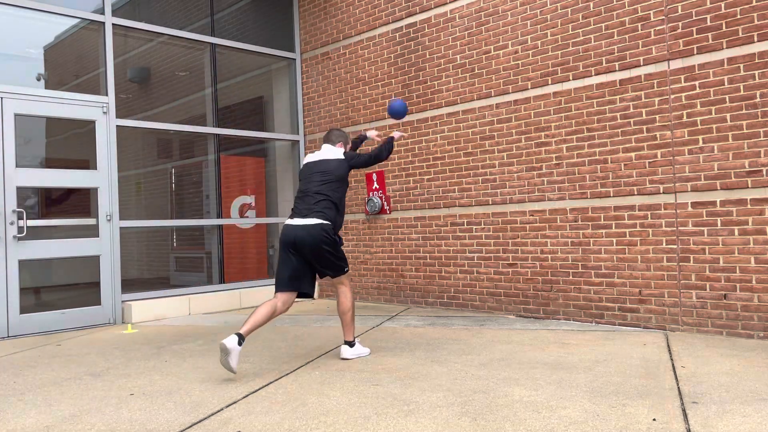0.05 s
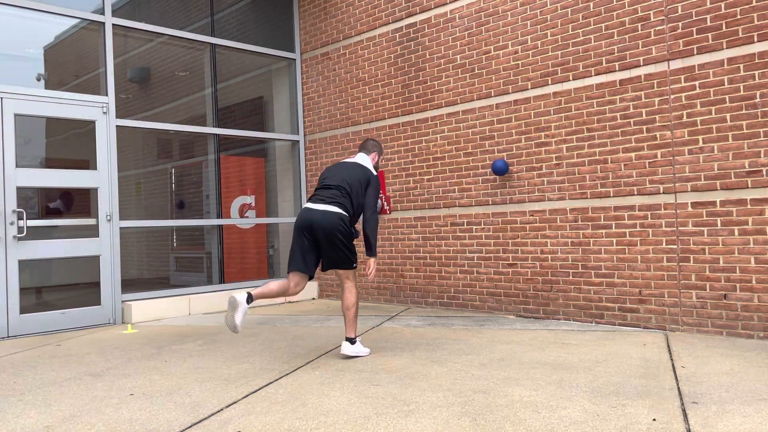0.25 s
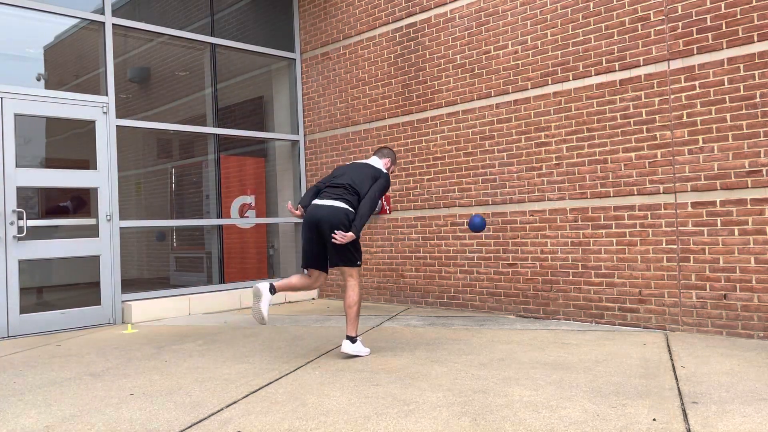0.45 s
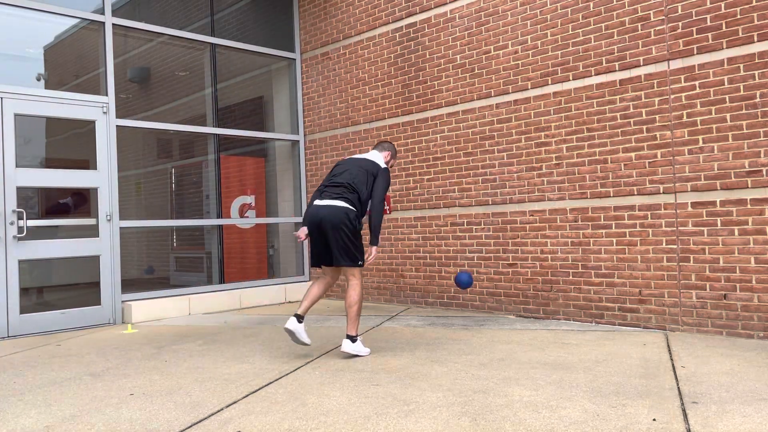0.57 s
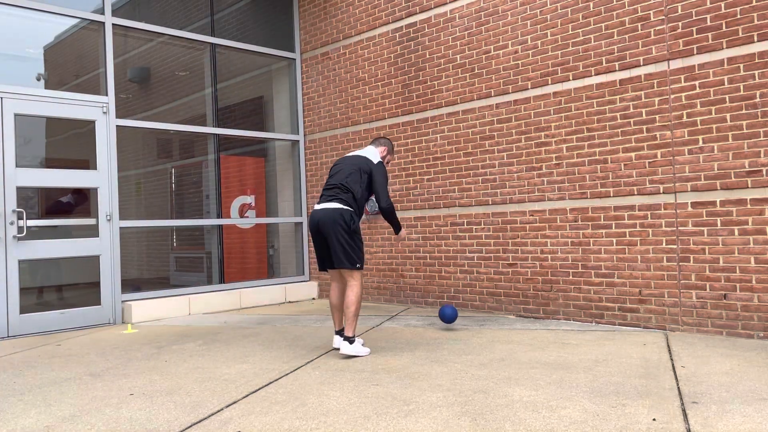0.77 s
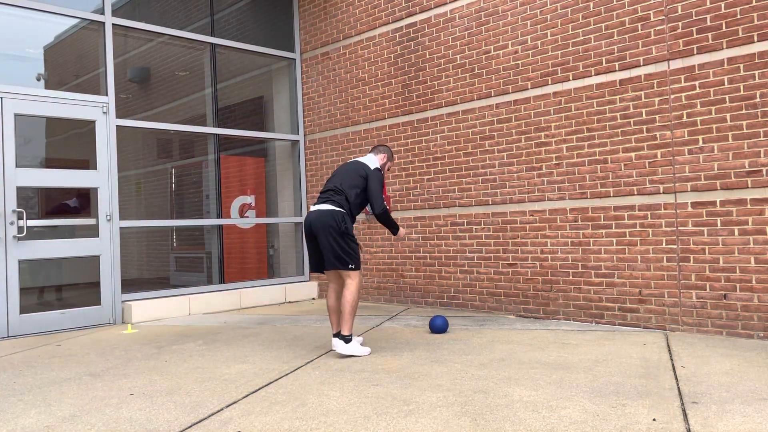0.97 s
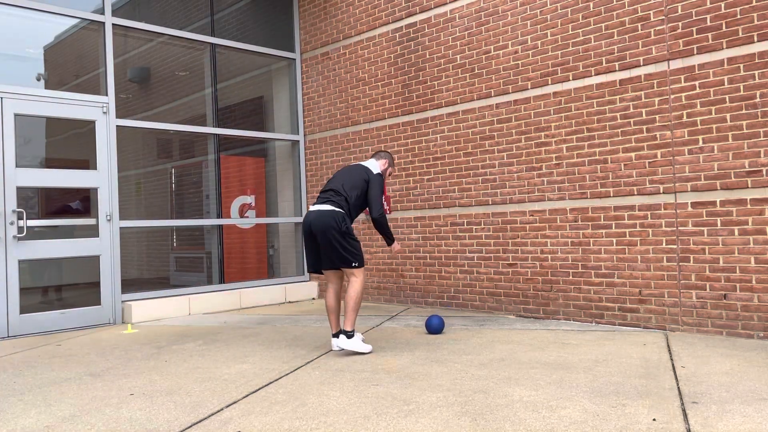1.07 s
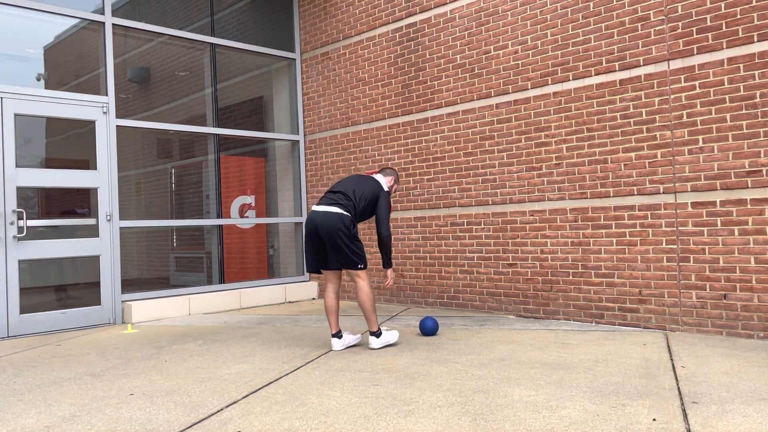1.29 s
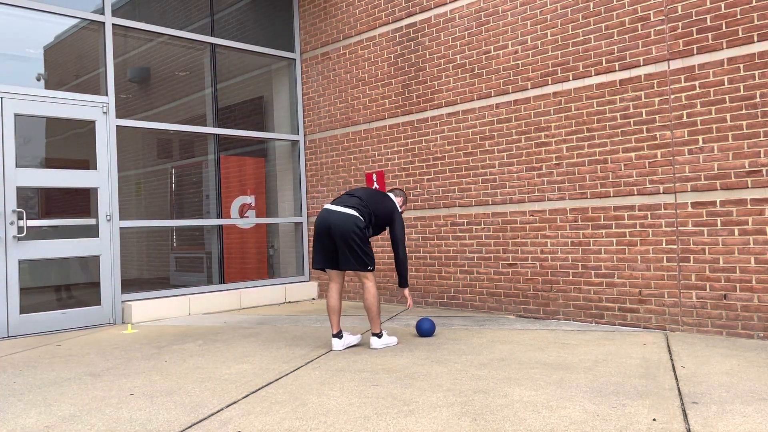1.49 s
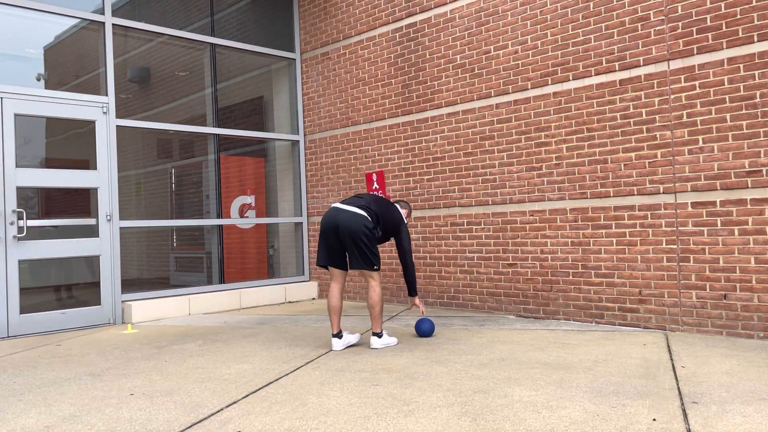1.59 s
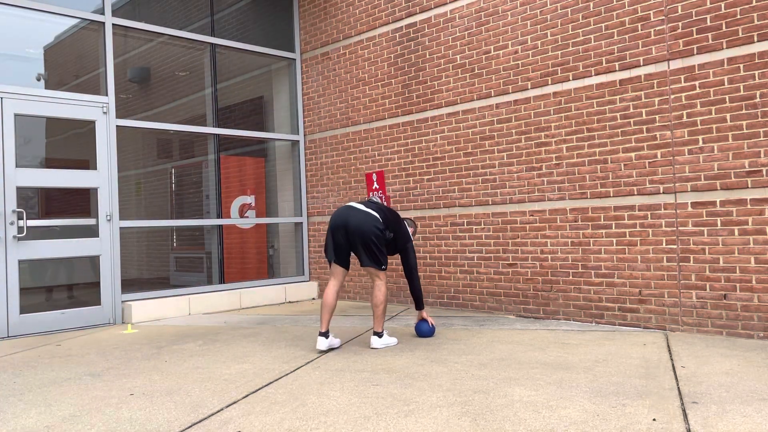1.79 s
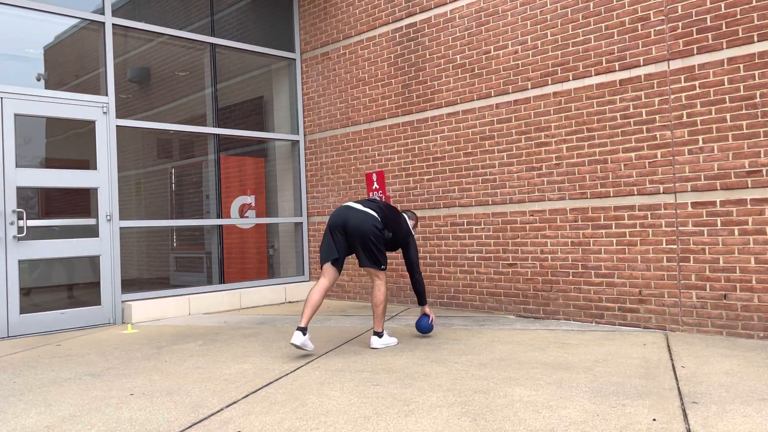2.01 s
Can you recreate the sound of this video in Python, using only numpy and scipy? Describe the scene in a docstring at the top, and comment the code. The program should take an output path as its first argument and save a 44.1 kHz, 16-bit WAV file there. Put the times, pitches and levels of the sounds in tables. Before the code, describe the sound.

A medicine ball slaps a brick wall outdoors, then drops more softly onto concrete.

```python
"""Outdoors, distant traffic and a ventilation hum run throughout. Grit cracks underfoot and the thrower's
clothes swish. At 0.22 s a small medicine ball slaps a brick wall: its skin snaps, its filling crunches
and its shell thuds. The corner of brick and glass answers with sharp echoes and a low boom.
At 0.67 s the ball drops onto the concrete, more softly. Then the thrower's shoes scuff."""
import sys
import numpy as np
from scipy import signal
from scipy.fft import rfft, irfft, next_fast_len
from scipy.io import wavfile
from scipy.ndimage import map_coordinates

SR = 44100
rng = np.random.default_rng(int(sys.argv[2]) if len(sys.argv) > 2 else 0)


def dump_mix(stems):
    """Bounce the given channels to the path in sys.argv[1] as a 16-bit WAV at rate SR."""
    frames = np.atleast_2d(stems).T  # one column per channel
    limited = np.clip(frames, -1, 1)  # hard clip at full scale
    pcm = np.round(limited * 32767).astype(np.int16)
    wavfile.write(sys.argv[1], SR, pcm)


N = 90404

CRACK_RISE_S = 0.0003
# how alike left and right are in echoes and the thrower's sounds (f/Hz, likeness: 1 = the same)
YARD_LIKENESS = [(100, 0.96), (250, 0.99), (600, 0.31), (2000, .35), (4500, .1), (7000, 0.4), (8500, 1),
                 (11000, .7), (13500, 1)]
# how alike they are in the background (f/Hz, likeness)
BACKGROUND_LIKENESS = [(60, 1), (200, 0.88), (500, 0.44), (1000, -0.5), (1500, -0.21), (2400, 0.16),
                       (5000, 0.25), (6500, -0.074), (8500, 0.89), (10500, .6), (13500, 1)]


def ball():
    """The ball hits the wall, then the ground; each blow makes the corner boom and echo."""
    # the two blows (t/s, snap/dB, crunch/dB, crunch fade/s, thud/dB, thud pitch ratio, boom/dB,
    # boom pitch ratio, first echo delay/s, first echo/dB, yard/dB)
    blows = [(0.2174, 8, -10.5, .014, -6, 0.95, -11, 1.0, .0012, 1, 2),
             (0.6739, 0, -22, 0.021, -17, 0.8, -28.5, 0.93, 0.0044, -12.5, -2.5)]
    # glass front, corner and farther walls, one list per blow
    # (delay/s, level/dB, left minus right/dB, treble edge/Hz, smear/s)
    walls_per_blow = [
        [(0.0139, -0.5, -1.5, 9270, 0.0024), (0.0213, -2.5, 3.5, 3460, .003), (0.062, -5.5, -2.5, 3000, .003),
         (.118, -27.5, 0, 2500, .004)],
        [(.0142, -11.5, 3, 8000, 0.0027), (.0605, -17, -2.5, 6100, .005)],
    ]
    out = np.zeros((2, N))
    for row, walls in zip(blows, walls_per_blow):
        (start, snap_db, crunch_db, crunch_fade_s, thud_db, thud_pitch,
         boom_db, boom_pitch, first_s, first_db, yard_db) = row
        snap = -amp(snap_db) * skin_snap(start)
        crunch = amp(crunch_db) * filling_crunch(start, crunch_fade_s)
        thud = -amp(thud_db) * shell_thud(start, thud_pitch)
        boom = amp(boom_db) * corner_boom(start, boom_pitch)
        blow = snap + crunch + thud
        first_echo = amp(first_db) * delayed(snap, first_s)
        echoes = wall_echoes(blow + amp(-16) * boom, walls)
        out += blow + first_echo + boom + echoes + amp(yard_db) * yard_wash(blow)
    return out


def skin_snap(start):
    """The ball's skin meets a hard surface with a single click."""
    # tone of the click (f/Hz, level/dB)
    colour = [(100, -9), (500, 0.5), (1000, 6.5), (1700, 4), (2500, 3.5), (4000, -4), (6500, -5),
              (11000, -7.5), (15500, -27.5)]
    log_spectrum = np.log(amp(along(colour, np.fft.rfftfreq(N, 1 / SR))))
    # folding the cepstrum packs the click's energy right after its start
    cepstrum = irfft(log_spectrum, N)
    cepstrum[1:N // 2] *= 2
    cepstrum[N // 2 + 1:] = 0
    click = irfft(np.exp(rfft(cepstrum)), N)
    return delayed(click, start)


def filling_crunch(start, fade_s):
    """The filling crunches at the blow and rattles softly after it."""
    # tone of the crunch (f/Hz, level/dB)
    colour = [(100, -13), (500, 7.5), (1000, 0.5), (1700, 0.5), (2500, -8.5), (4000, -10.5), (6500, -13.5),
              (11000, -11), (15500, -18.5)]
    # how alike left and right are in the direct sound (f/Hz, likeness)
    likeness = [(1000, 0.892), (6500, 0.89), (8500, 1), (11000, .9), (13500, 1)]
    t = since(start)
    rattle = amp(-17.5) * fade(t, CRACK_RISE_S, fade_s=0.052)
    return noise(colour, likeness) * (fade(t, CRACK_RISE_S, fade_s) + rattle)


def shell_thud(start, pitch):
    """The squashed ball rings briefly, just after the snap."""
    # tones of the shell and filling (f/Hz, level/dB, fade/s)
    tones = [(167.4, -2.5, 0.055), (235, 0.5, 0.055), (290.7, 0.5, 0.047), (464, -10, 0.068),
             (585, -18, .06), (680, -18, 0.043), (972, -22, 0.031), (1787, -21.5, 0.02063)]
    return ring(tones, start + 0.003, pitch, rise_s=0.0022)


def corner_boom(start, pitch):
    """A moment after the blow, the corner rings with deep tones."""
    # low tones of the glazed corner (f/Hz, level/dB, fade/s)
    tones = [(68.6, 5, 0.29), (55.7, -17.5, 0.97), (100.5, -15, 0.43), (158, -11, 0.3)]
    return ring(tones, start + 0.013, pitch, rise_s=0.005)


def wall_echoes(x, walls, scatter=1.1):
    """Each wall returns a duller copy, its treble smeared by joints and frames."""
    # share of the sound that walls scatter (f/Hz, level/dB)
    scattered = [(100, -20), (500, -6), (1500, -1), (15000, -1.5)]
    t, out = since(0), np.zeros((2, N))
    for delay, db, pan_db, edge_hz, smear in walls:
        answer = noise(scattered, YARD_LIKENESS) * np.exp(-t / smear)
        answer *= scatter / np.linalg.norm(answer[0])
        answer[:, 0] += 1  # the clean, mirror-like part
        smeared = convolved(x, answer)
        echo = filtered(smeared, lambda hz: np.exp(-2j * np.pi * hz * delay) / (1 + 1j * hz / edge_hz))
        out += amp(db + np.array([[pan_db], [-pan_db]]) / 2) * echo / np.hypot(1, scatter)
    return out


def yard_wash(x):
    """Many echoes blur into a short wash from the corner and a longer tail."""
    # how long the yard rings (f/Hz, fade/s)
    fade_times = [(60, 0.86), (250, 0.4), (1500, .4), (5000, 0.46), (14000, 0.33)]
    # tone of the wash (f/Hz, level/dB)
    colour = [(60, -0.5), (130, 5), (250, -0.5), (600, -0.5), (4000, -2.5), (13000, -2)]
    rise_s = 0.004
    hz, t, bands = signal.stft(noise(colour, YARD_LIKENESS), SR, nperseg=256)
    bands = bands * fade(t, rise_s, along(fade_times, hz)[:, None])
    far = signal.istft(bands, SR, nperseg=256)[1][:, :N]
    near = noise(colour, YARD_LIKENESS) * fade(since(0), rise_s, fade_s=0.17)
    answer = amp(-10.5) * far / np.linalg.norm(far[0]) + amp(-9.5) * near / np.linalg.norm(near[0])
    return convolved(x, answer)


def grit():
    """Grains crack underfoot in tiny bursts of noise."""
    # the cracks (t/s, level/dB)
    cracks = [(.014, -41.5), (0.908, -52), (1.387, -48.5), (1.395, -53), (1.437, -62), (1.83, -60),
              (1.977, -55)]
    # their tone (f/Hz, level/dB)
    colour = [(1000, -5), (2700, -0.5), (4300, -5.5), (6000, -12), (15000, -14)]
    bursts = sum(amp(db) * fade(since(start), CRACK_RISE_S, fade_s=0.0078) for start, db in cracks)
    return bursts * noise(colour, YARD_LIKENESS)


def clothes():
    """Sleeves and shorts rub and swish."""
    # the swishes (peak t/s, level/dB, rise/s, fall/s)
    swishes = [(.072, -46.5, 0.035, 0.027), (.13, -65, .02, 0.035), (.35, -46, .018, 0.03),
               (.415, -54.5, .025, 0.052), (.98, -66, 0.042, 0.079), (1.67, -73.5, .12, 0.051)]
    # tone of the cloth (f/Hz, level/dB)
    colour = [(300, 0.5), (1000, 7), (3000, -5.5), (7000, -6.5), (10500, 2.5), (13000, -5.5), (15500, -1.5)]
    return rubbing(swishes, colour, rough_db=2.5)


def shoes():
    """Soles scuff the concrete."""
    # the scuffs (peak t/s, level/dB, rise/s, fall/s)
    scuffs = [(.955, -52, 0.047, 0.067), (1.40, -65.5, .02, 0.046), (1.70, -62.5, 0.068, 0.032)]
    # tone of the soles (f/Hz, level/dB)
    colour = [(300, -0.5), (1400, 2), (2500, 3), (3500, -6.5), (6500, -15.5), (11000, -23.5), (15500, -25)]
    return rubbing(scuffs, colour, rough_db=3.0)


def ventilation():
    """Ventilation hums unsteadily, and its duct adds a thin hiss."""
    # tones of the hum (f/Hz, level/dB)
    tones = [(118.6, -47.5), (323, -63.5), (2374, -74.5)]
    # tone of the hiss (f/Hz, level/dB)
    hiss_colour = [(4300, -35), (5000, -4), (5200, 2), (5400, -13.5), (6200, -48.5)]
    t, hum = since(0), np.zeros(N)
    for hz, db in tones:
        drift = 0.037 * np.sqrt(hz) * wobble(14)
        hum += amp(db) * np.sqrt(2) * np.sin(2 * np.pi * hz * t + drift)
    return hum + amp(-85.5) * noise(hiss_colour, BACKGROUND_LIKENESS)


def traffic():
    """Distant traffic rumbles at a slightly wavering level."""
    # tone of the rumble (f/Hz, level/dB)
    colour = [(20, -29.5), (32, -15.5), (55, -1), (90, -4.5), (122, -3.5), (150, -10.5), (240, -12.5),
              (322, -11), (450, -18.5), (650, -21), (1000, -17.5), (1500, -25), (2400, -38), (3500, -50),
              (6500, -61.5), (12000, -63.5), (15500, -65.5)]
    return amp(-41.5 + 0.6 * wobble(4.6)) * noise(colour, BACKGROUND_LIKENESS)


def rubbing(strokes, colour, rough_db):
    """Grainy friction noise that swells and dies with each stroke."""
    t, level = since(0), np.zeros(N)
    for peak, db, rise, fall in strokes:
        width = np.where(t < peak, rise, fall)
        level += amp(db) * np.exp(-np.abs((t - peak) / width) ** 1.8)
    return level * unit(noise(colour, YARD_LIKENESS) * amp(rough_db * wobble(300)))


def ring(tones, start, pitch, rise_s):
    """Fading tones set off together; pitch multiplies their frequencies."""
    t = since(start)
    return sum(amp(db) * fade(t, rise_s, fade_s) * np.sin(2 * np.pi * hz * pitch * t)
               for hz, db, fade_s in tones)


def noise(colour, likeness):
    """Stereo noise of average power 1 with a given tone and left-right likeness."""
    def gains(hz):
        turn = np.arccos(np.clip(along(likeness, hz), -1, 1)) / 2
        return amp(along(colour, hz)) * [np.cos(turn), np.sin(turn)]
    mid, side = filtered(rng.standard_normal((2, N)), gains)
    return unit(np.array([mid + side, mid - side]))


def amp(db):
    return 10 ** (np.asarray(db) / 20)


def unit(x):
    return x / np.sqrt(np.mean(x ** 2) + 1e-20)


def along(points, hz):
    """Read between (f/Hz, value) points on a log frequency axis."""
    freqs, values = np.transpose(points)
    return np.interp(np.log(hz + 1), np.log(freqs + 1), values)


def since(start):
    """Seconds since start, zero before it."""
    return np.maximum(np.arange(N) / SR - start, 0)


def fade(t, rise_s, fade_s):
    """A quick rise and a fall of 60 dB every fade_s seconds."""
    return (1 - np.exp(-t / rise_s)) * np.exp(-np.log(1000) * t / fade_s)


def wobble(rate):
    """A smooth curve through rate random points a second."""
    return map_coordinates(rng.standard_normal(int(N * rate / SR) + 4), [np.arange(N) * rate / SR])


def filtered(x, response):
    """Change the level and phase of each frequency by response(hz)."""
    size = next_fast_len(N + SR // 2)
    return irfft(rfft(x, size) * response(np.fft.rfftfreq(size, 1 / SR)), size)[..., :N]


def delayed(x, delay_s):
    return filtered(x, lambda hz: np.exp(-2j * np.pi * hz * delay_s))


def convolved(x, answer):
    return signal.fftconvolve(x, answer, axes=-1)[:, :N]


def scene():
    """Ball and thrower, leaning slightly left in the middle range, over the background."""
    # lean of the near sounds (f/Hz, left minus right/dB)
    balance = [(100, -1), (600, -0.3), (1400, 3), (5000, 3.5), (10000, 0)]
    sides = np.array([[1], [-1]]) / 2
    near = ball() + grit() + clothes() + shoes()
    return filtered(near, lambda hz: amp(sides * along(balance, hz))) + ventilation() + traffic()


def record(dry):
    """The left microphone port lags in the treble; peaks are rounded off and the highest treble is cut."""
    # lag of the left port (f/Hz, phase/rad: negative = later)
    port_phase = [(0, 0), (5000, 0), (6200, -1.3), (7700, -2.95), (9200, -3.25), (10200, -4.1),
                  (12000, -5.35), (13500, -6.28)]
    left_only = np.array([[1], [0]])
    ceiling, top_hz = 0.95, 16000
    x = filtered(dry, lambda hz: np.exp(1j * left_only * np.interp(hz, *np.transpose(port_phase))))
    x = x / (1 + np.abs(x / ceiling) ** 6) ** (1 / 6)
    return filtered(x, lambda hz: 1 / (1 + (hz / top_hz) ** 120))


dry = scene()
out = record(dry)
dump_mix(out)
```